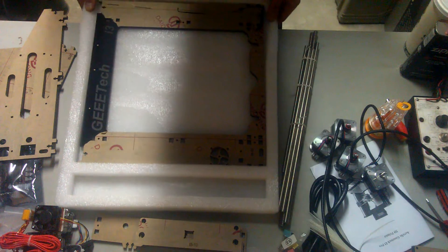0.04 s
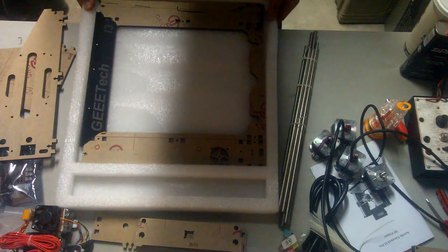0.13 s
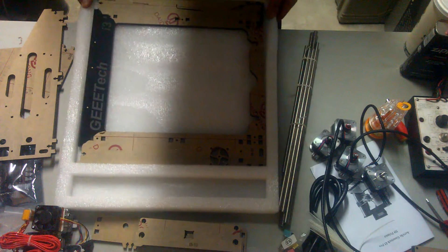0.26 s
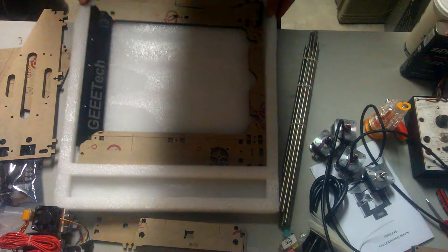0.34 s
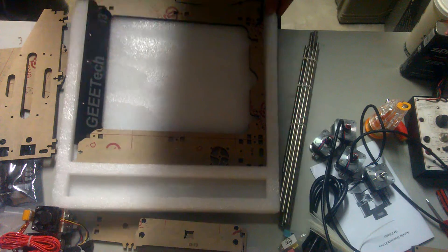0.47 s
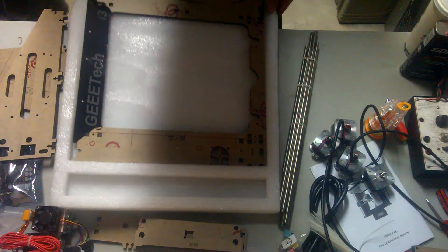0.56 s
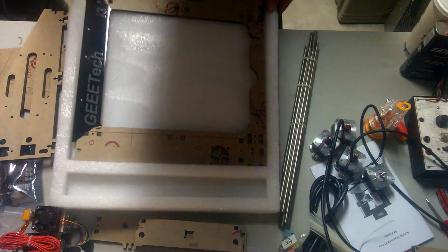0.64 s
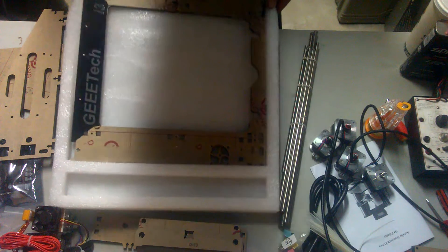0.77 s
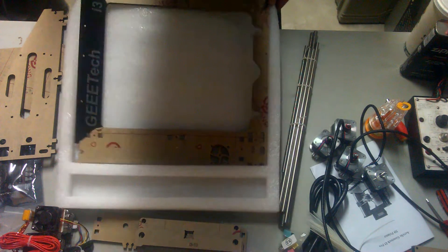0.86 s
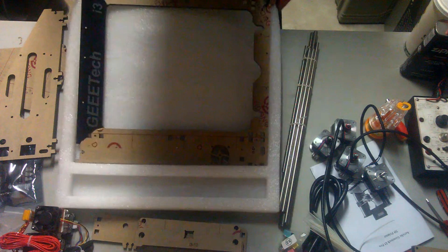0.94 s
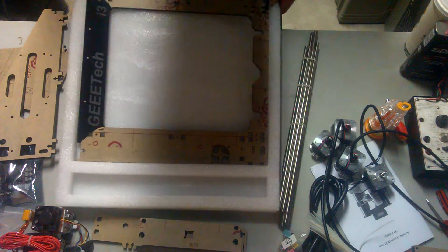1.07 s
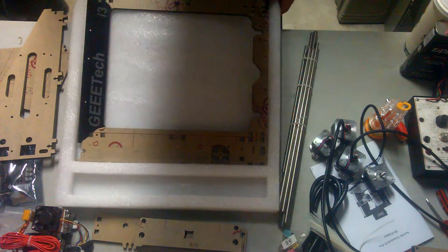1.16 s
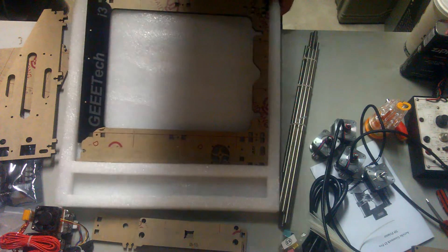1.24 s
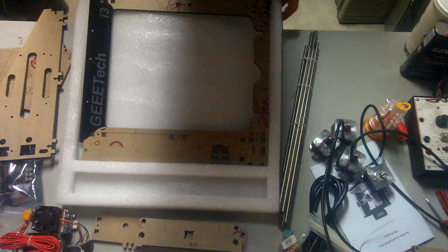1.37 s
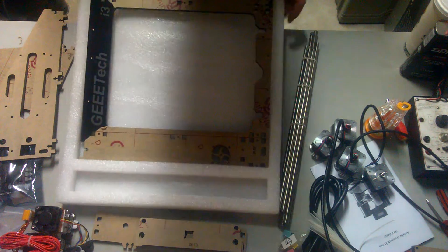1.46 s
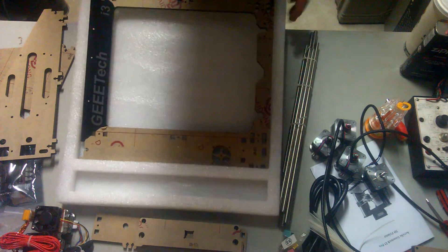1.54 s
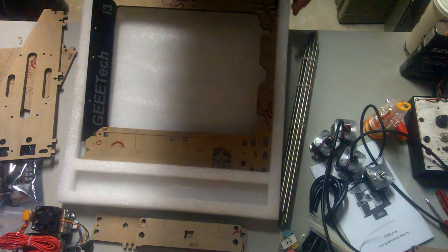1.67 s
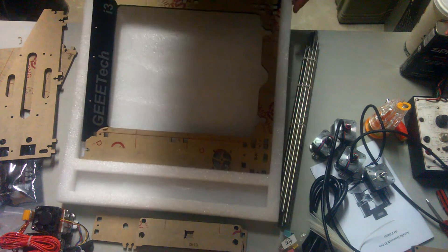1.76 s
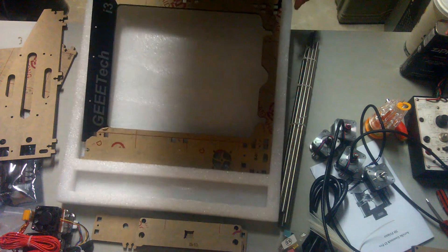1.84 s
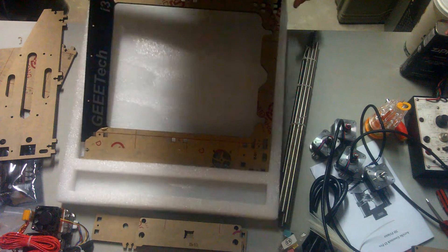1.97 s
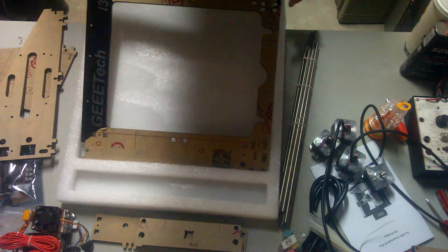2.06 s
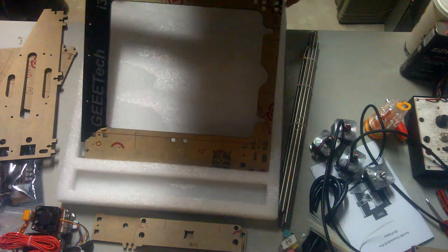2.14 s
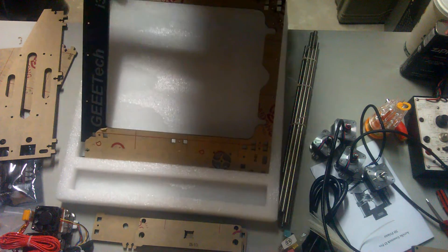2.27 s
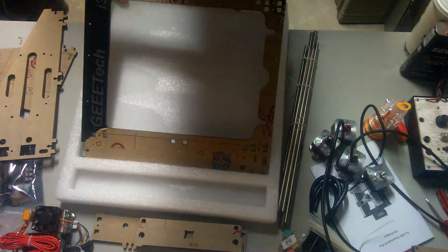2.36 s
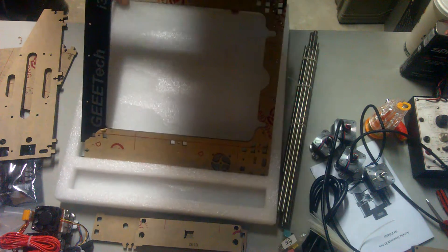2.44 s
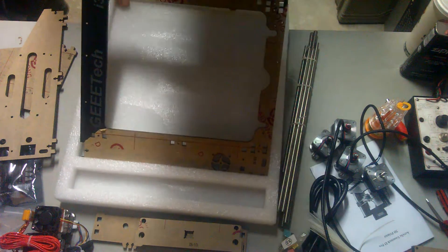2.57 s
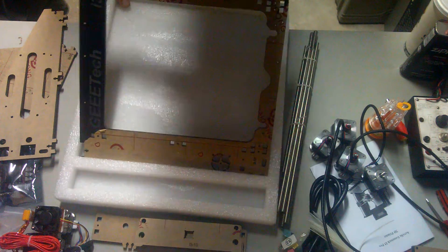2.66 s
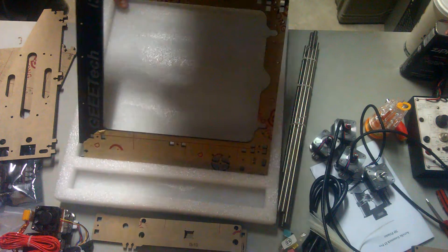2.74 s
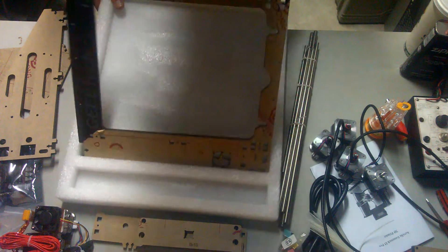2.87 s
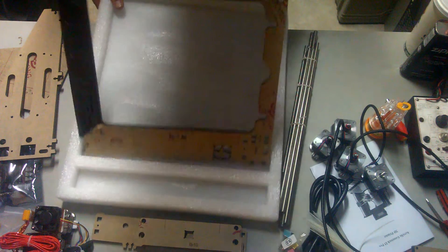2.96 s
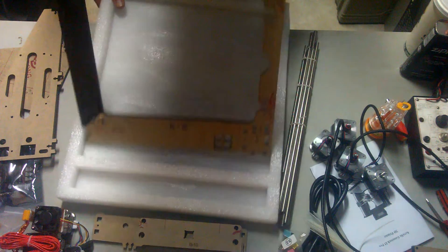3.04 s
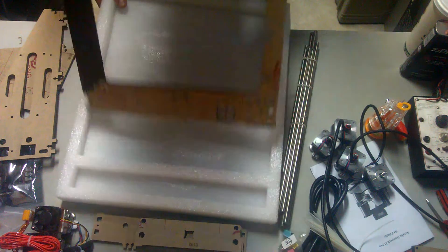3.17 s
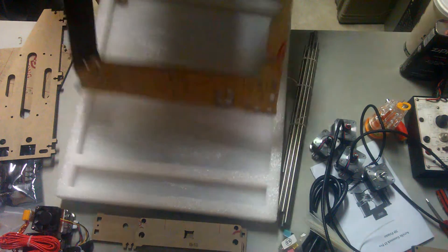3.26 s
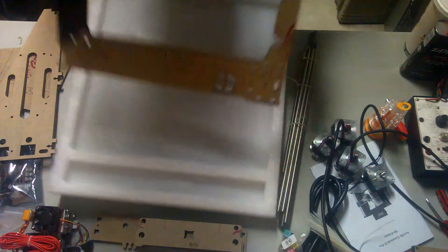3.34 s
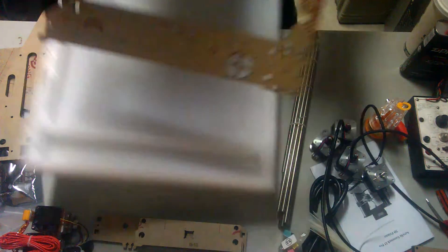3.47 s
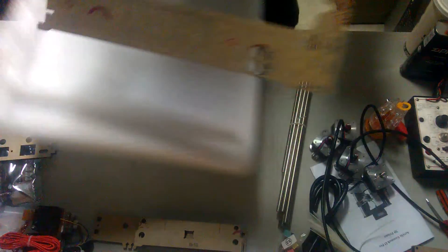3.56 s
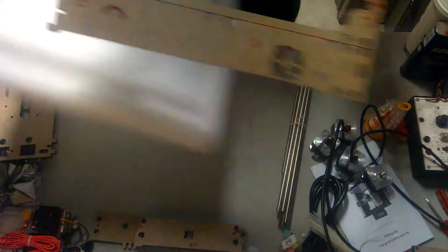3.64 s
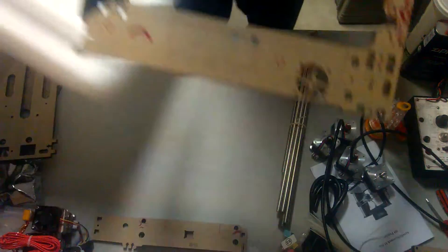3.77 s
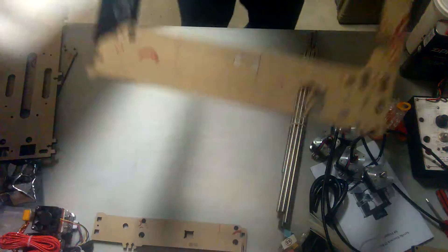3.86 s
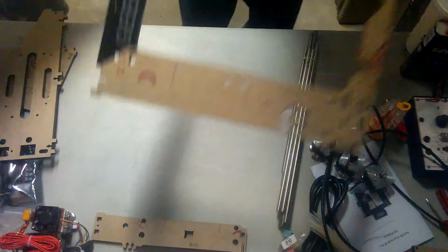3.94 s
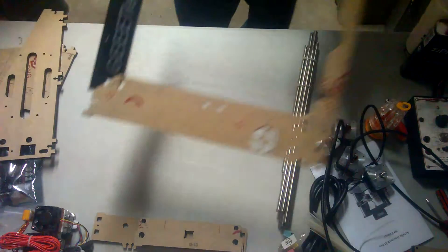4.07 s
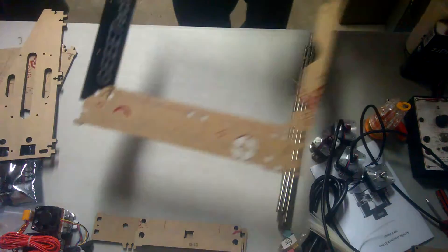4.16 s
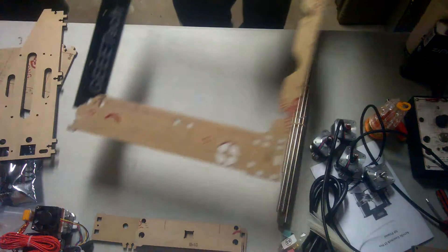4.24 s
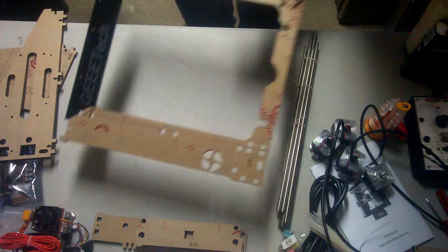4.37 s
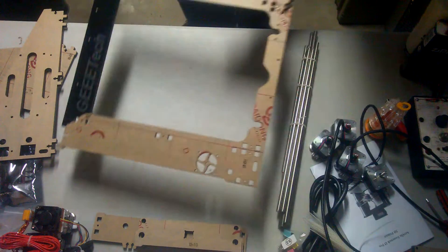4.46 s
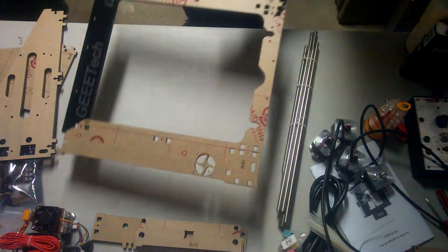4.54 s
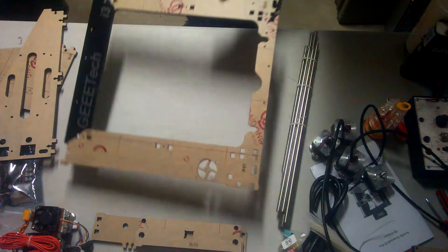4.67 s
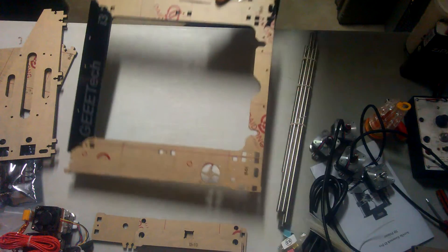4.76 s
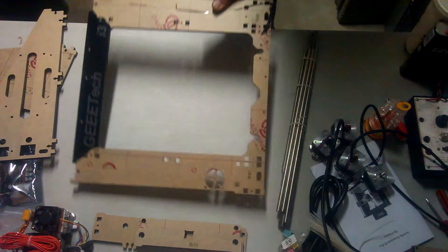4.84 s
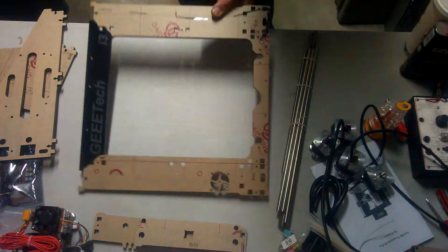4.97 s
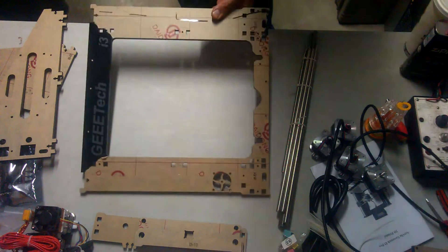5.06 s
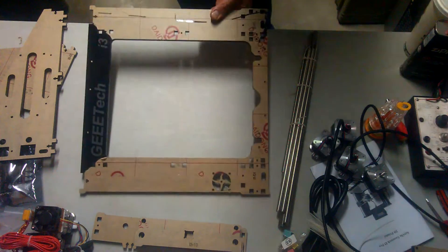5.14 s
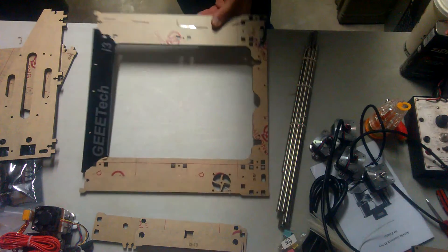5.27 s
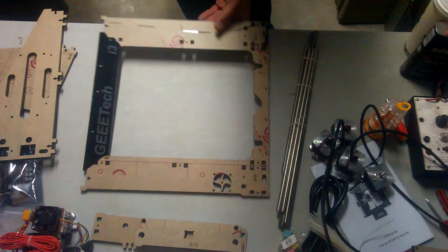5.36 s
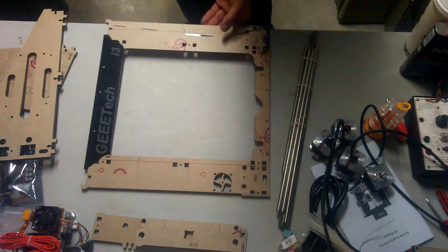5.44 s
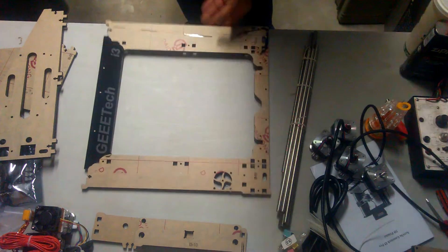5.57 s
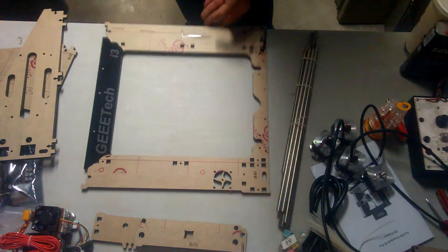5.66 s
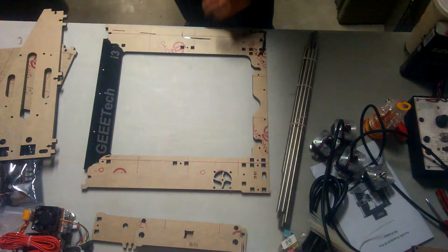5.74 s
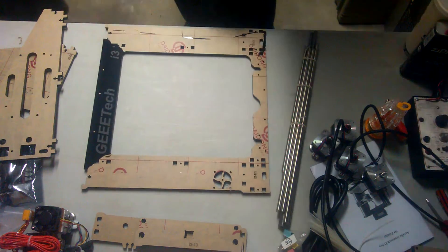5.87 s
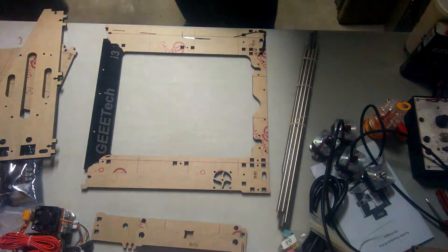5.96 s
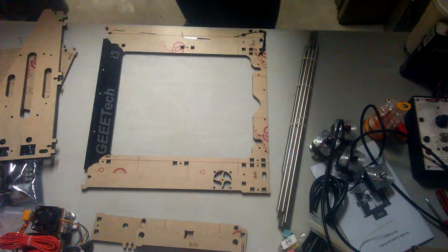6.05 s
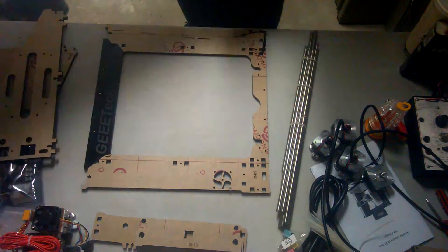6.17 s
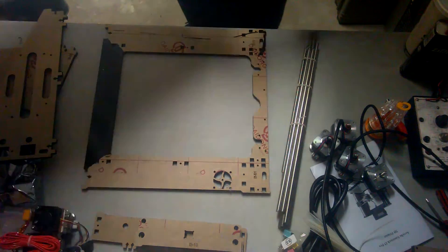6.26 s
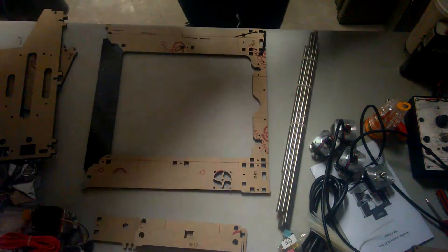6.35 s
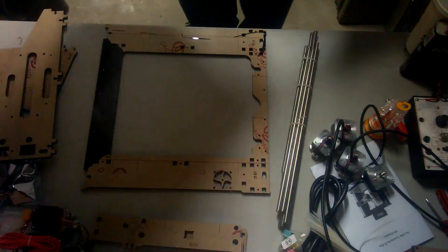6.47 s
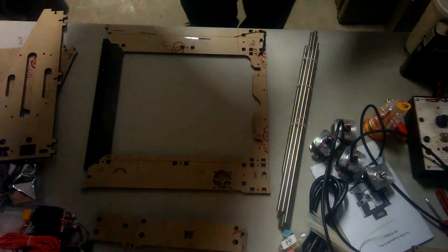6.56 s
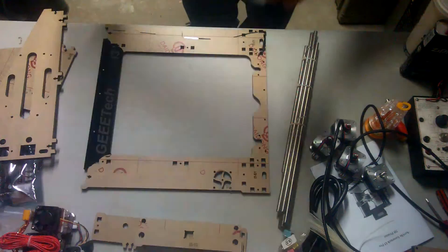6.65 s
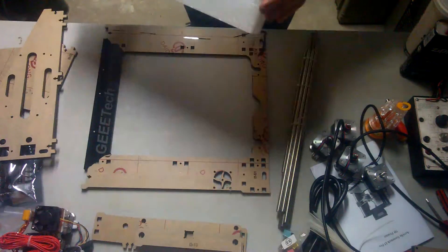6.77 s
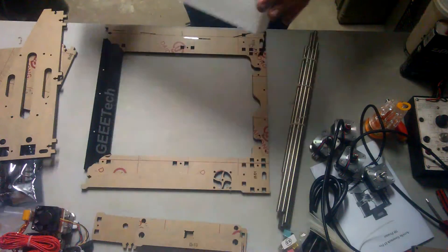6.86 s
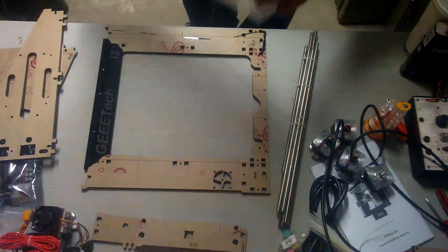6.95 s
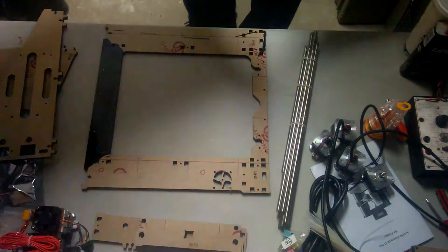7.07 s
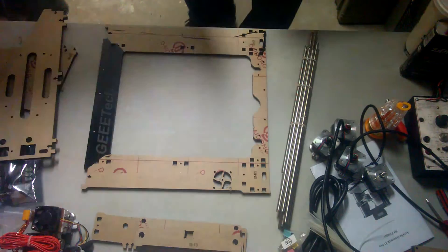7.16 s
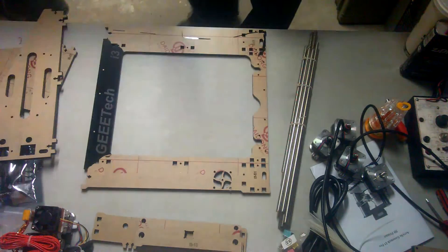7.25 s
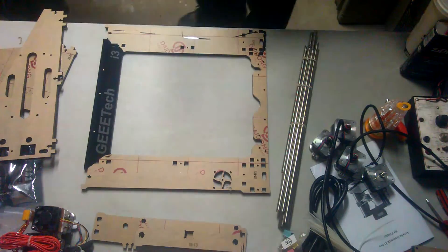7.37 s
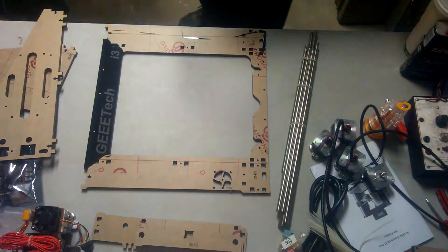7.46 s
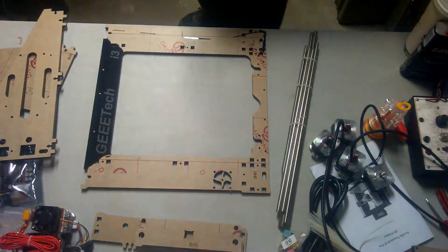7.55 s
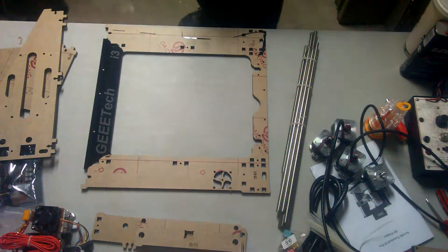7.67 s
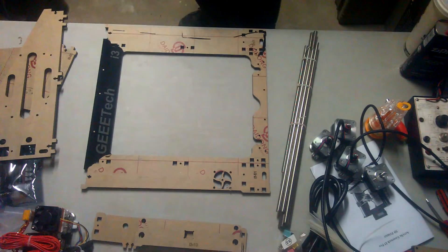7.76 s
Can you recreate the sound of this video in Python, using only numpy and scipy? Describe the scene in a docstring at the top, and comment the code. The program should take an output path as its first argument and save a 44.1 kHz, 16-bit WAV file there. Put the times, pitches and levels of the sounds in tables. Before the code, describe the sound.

Packing foam rubs and squeaks dryly against a wooden frame, then the frame clacks loudly onto a table and the foam is brushed and set aside.

```python
"""Foam packing rubs on a wooden frame: each pull is stick-slip friction, noise shaped by countless tiny slips.
Skin hiss and lower slab rustle are coloured bands of that noise; squeaks are its judder modulating a tone.
As the frame comes out and is laid down, blows ring decaying modes of wood, edges slide, and foam lands and thuds.
A small reverberant room adds air noise, a wavering hum and a fan tone; two cross-fed ports widen the stereo.
"""
import sys
import numpy as np
from scipy import signal
from scipy.fft import rfft, irfft
from scipy.io import wavfile
from scipy.ndimage import uniform_filter1d

SR = 44100
rng = np.random.default_rng(int(sys.argv[2]) if len(sys.argv) > 2 else 0)


def to_wav(s):
    """Save 16-bit WAV."""
    ch = np.atleast_2d(s).T  # columns
    pcm = np.round(np.clip(ch, -1, 1) * 32767)  # PCM
    wavfile.write(sys.argv[1], SR, pcm.astype(np.int16))


N = 344421
TIME = np.arange(N) / SR

# modes of the frame lying on the table, before extra damping: (frequency [Hz], level [dB], t60 [s])
FRAME_MODES = [(134, -3.5, 0.23), (211.7, 0.5, 0.45), (272, 1.5, 0.33), (338, -2.5, 0.12), (370, 1, 0.27),
               (480, -5, 0.18), (563, -5.5, 0.39), (633, -1.5, 0.19), (724, -9.5, 0.22), (792, -8, 0.31),
               (835, -7.5, 0.19), (867, -1.5, 0.18), (918, -3, 0.28), (1070, -2, 0.13), (1218, -5, 0.19),
               (1413, -11, 0.19), (1470, -19, 0.14), (1623, -3.5, 0.11), (1776, -6, 0.2), (1900, -19, 0.16),
               (1990, -18, 0.2)]
# spectrum of the foam's rubbing skin: (frequency [Hz], level [dB])
SKIN_SPECTRUM = [(300, -15.5), (1200, -24.5), (2200, -15), (3200, -11.5), (5000, -17), (8000, -10),
                 (11000, -6), (14200, 1), (16000, -3)]
# spectrum of the foam slab's rustle: (frequency [Hz], level [dB])
SLAB_SPECTRUM = [(60, -41), (200, 1), (450, 2.5), (750, 0.5), (1200, -2), (1700, -5), (2400, -11),
                 (5000, -9.5)]
# spectrum of the frame's scraping edge: (frequency [Hz], level [dB])
EDGE_SPECTRUM = [(100, -21), (250, 12), (550, 19.5), (950, 11), (1650, -2), (2300, 7), (3900, -21),
                 (7000, -16), (15000, -25)]


def undb(db):
    """Level to amplitude: 20 dB is a factor of ten."""
    return 10 ** (np.asarray(db) / 20)


def unit(x):
    """Normalise the mean power: scale to rms 1."""
    return x / np.sqrt(np.mean(x ** 2))


def response(points, size):
    """Transfer function: gain per frequency bin, interpolated in dB over log frequency."""
    hz, db = np.transpose(points)
    bins_hz = np.fft.rfftfreq(size, 1 / SR)
    return undb(np.interp(np.log(bins_hz + 1), np.log(hz), db))


def colour(x, points):
    """Linear filtering: multiply the spectrum by a gain curve, then scale to rms 1."""
    size = x.shape[-1]
    return unit(irfft(rfft(x) * response(points, size), size))


def band_level(x, band):
    """Band-power normalisation: scale so that one band has rms 1."""
    band_filter = signal.butter(4, band, "band", fs=SR, output="sos")
    return x / np.std(signal.sosfilt(band_filter, x))


def onset_level(x):
    """Onset normalisation: scale so that the first 20 ms have rms 1."""
    return x / np.std(x[:, :SR // 50])


def fade(t60, size):
    """Exponential damping: amplitude falls by 60 dB in t60 seconds."""
    return np.exp(-np.log(1000) * TIME[:size] / t60)


def walk(rate):
    """Slow random modulation: a smoothed wander of rms 1, with a new target rate times a second."""
    hold = int(SR / rate)
    targets = rng.standard_normal(N // hold + 1)
    return unit(uniform_filter1d(np.repeat(targets, hold), hold)[:N])


def diffuse(size, likeness=0.67, apart_hz=900):
    """Diffuse-field coherence: long waves reach both ports partly alike, short ones are unrelated."""
    alike = likeness / (1 + (np.fft.rfftfreq(size, 1 / SR) / apart_hz) ** 2)
    mid, side = rfft(rng.standard_normal((2, size)))
    mid = mid * np.sqrt(1 + alike)
    side = side * np.sqrt(1 - alike)
    return unit(irfft(np.array([mid + side, mid - side]), size))


def room(x, wet_db, t60_s=0.24):
    """Reverberation: convolve with exponentially decaying diffuse noise and add it to the direct sound."""
    size = SR // 2
    after_gap = TIME[:size] > 0.006  # first 6 ms stay free of reverberation
    tail = diffuse(size) * fade(t60_s, size) * after_gap
    tail /= np.sqrt(np.sum(tail ** 2) / 2)  # unit energy per port
    return x + undb(wet_db) * signal.fftconvolve(x, tail, axes=1)[:, :N]


def ring(modes, size, damping, spread=0.14, centred=False):
    """Modal synthesis: a sum of damped sinusoids, a little out of phase at the two ports."""
    if centred:  # modes start near zero, alternately rising and falling
        phases = np.pi * np.arange(len(modes))[:, None]
    else:
        phases = rng.uniform(0, 2 * np.pi, (len(modes), 1))
    phases = phases + spread * rng.standard_normal((len(modes), 2))
    total = 0
    for (hz, db, t60), phase in zip(modes, phases):
        swing = np.sin(2 * np.pi * hz * TIME[:size] + phase[:, None])
        total = total + undb(db) * fade(t60 / damping, size) * swing
    return total


def add(track, s, sound):
    """Superposition: mix a sound into the track from a given second."""
    start = int(s * SR)
    track[:, start:start + sound.shape[1]] += sound[:, :N - start]


def stroke(start, length, attack_s=0.013, release_s=0.01, easing=0.012):
    """Envelope of one push: exponential approach, hold and decay; longer strokes ease more slowly."""
    age = np.maximum(TIME - start, 0)
    ease = easing * length
    attack = (1 - np.exp(-age / (attack_s + ease))) ** 2
    release = np.exp(-np.maximum(age - length, 0) / (release_s + ease))
    return attack * release


def friction(rate, scatter_db, judder_db, judder_rate, grain_t60):
    """Stick-slip friction: random slips of uneven size, each releasing a decaying burst of noise power."""
    occurs = rng.random(N) < rate / SR  # rate in slips per second
    slips = occurs * undb(scatter_db * np.minimum(rng.exponential(size=N), 5))
    slips = slips * undb(judder_db * walk(judder_rate))
    decay = fade(grain_t60, 2)[1] ** 2  # power kept from one sample to the next
    power = signal.lfilter([1], [1, -decay], slips ** 2 + 1e-18)
    return diffuse(N) * np.sqrt(power)


def crackle(rate=110, scatter_db=1.0, t60=0.011):
    """Buckling instability: now and then a whole cell wall gives way with a tiny tick; rms 1."""
    return unit(friction(rate=rate, scatter_db=scatter_db, judder_db=2.0, judder_rate=28, grain_t60=t60))


def patchy(x, depth_db, size):
    """Time-varying filtering: narrow bands swell and sink as the contact moves from patch to patch."""
    bands = signal.stft(x, nperseg=size)[2]
    swell = rng.standard_normal(bands.shape[1:])
    swell = uniform_filter1d(swell, size=3, axis=0)  # across frequency
    swell = uniform_filter1d(swell, size=4, axis=1)  # through time
    return signal.istft(bands * undb(depth_db * unit(swell)))[1][:, :N]


def background():
    """Broadband flow noise and tonal hum: ventilation rumble, faint hiss, wavering hum and thin fan tone."""
    # spectrum of the ventilation's air noise: (frequency [Hz], level [dB])
    air_spectrum = [(20, -2), (45, 1.5), (75, 1), (115, -3.5), (200, -6.5), (400, -6), (700, -10.5),
                    (1100, -22), (2000, -31), (4000, -34), (8000, -29.5), (14500, -23.5)]
    # level of the whole background over time, dipping just after the loud slap: (time [s], level [dB])
    swell_points = [(0, 4.5), (1.1, 1), (2.5, -0.5), (4.1, 1.5), (4.7, -2), (5.5, 4.5), (5.85, -4.5),
                    (6.1, -5.5), (6.6, -1.5), (7.2, 0.5), (7.8, 0)]
    air = band_level(colour(diffuse(N), air_spectrum), (100, 700))
    hum_hz = 78.6 + 3.45 * walk(20)
    hum = np.sin(2 * np.pi * np.cumsum(hum_hz) / SR) * undb(3.3 * walk(12))
    fan_hz = 347 + 3 * walk(15)
    fan = np.sin(2 * np.pi * np.cumsum(fan_hz) / SR) * undb(1.3 * walk(4.8))
    swell = undb(np.interp(TIME, *np.transpose(swell_points)))
    air_gain = undb(-50.5 + 1.3 * walk(4.5))
    return (air_gain * air + undb(-54.5) * unit(hum) + undb(-63) * unit(fan)) * swell


def slides(frame_db=-3, ring_hz=3900, ring_width_hz=700, ring_db=-17):
    """Friction-driven resonance: the edge's slips excite the frame's modes, a faint ring and a hiss."""
    # the frame's edge sliding on the table:
    # (start [s], length [s], chatter [dB], hiss [dB], lowest frequency [Hz], highest frequency [Hz])
    slide_events = [(4.315, 0.045, -46, -47.5, 600, 1410), (5.131, 0.14, -51, -54, 120, 920),
                    (5.415, 0.068, -41, -44.5, 860, 1750), (5.5, 0.088, -48, -42.5, 150, 1700)]
    slips = friction(rate=2100, scatter_db=-3.0, judder_db=-3.5, judder_rate=76, grain_t60=0.017)
    frame = signal.fftconvolve(slips, ring(FRAME_MODES, SR // 4, damping=2.0), axes=1)[:, :N]
    chatter = colour(slips, EDGE_SPECTRUM) + undb(frame_db) * unit(frame)
    whine = unit(signal.lfilter(*signal.iirpeak(ring_hz, ring_hz / ring_width_hz, fs=SR), slips))
    hiss = colour(diffuse(N), SKIN_SPECTRUM)
    out = 0
    for start, length, chatter_db, hiss_db, low_hz, high_hz in slide_events:
        contact = signal.butter(2, [low_hz, high_hz], "band", fs=SR, output="sos")
        wood = unit(signal.sosfilt(contact, chatter)) + undb(ring_db) * whine
        out = out + (undb(chatter_db) * wood + undb(hiss_db) * hiss) * stroke(start, length)
    return room(out, wet_db=-1.0)


def edge_knocks(scuff_db=-11, scuff_t60=0.25):
    """Contact low-pass: a soft bump of the held frame's edge excites only its lowest modes, plus a scuff."""
    # bottom edge bumping the table: (time [s], level before a common trim [dB], contact bandwidth [Hz])
    edge_events = [(4.9263, -24, 1000), (4.932, -26.5, 620), (4.9405, -21, 280), (4.994, -31, 500),
                   (5.05, -30, 377), (5.084, -37, 500), (5.221, -37.5, 550), (5.427, -32, 260),
                   (5.473, -30, 240)]
    # frame tilted on its edge in the hand, before a damping factor: (frequency [Hz], level [dB], t60 [s])
    held_modes = [(84, -22, .12), (232, 6.5, 0.098), (350, -4, .08), (435, -5.5, 0.24), (512.4, 1, 0.15),
                  (624, -3, 0.11), (824, -15, 0.12), (1020, -21, 0.12)]
    out, size = np.zeros((2, N)), SR // 2
    for s, db, contact_hz in edge_events:
        contact = signal.butter(2, contact_hz, fs=SR, output="sos")
        notes = ring(held_modes, size, damping=0.76, centred=True)
        notes = onset_level(signal.sosfilt(contact, notes))
        scuff = colour(diffuse(size), EDGE_SPECTRUM) * fade(scuff_t60, size)
        scuff = onset_level(signal.sosfilt(contact, scuff))
        add(out, s, undb(db - 4.5) * (notes + undb(scuff_db) * scuff))
    return room(out, wet_db=-13)


def knocks(choke_s=0.022):
    """Impact excitation: blows ring frame and table; the contact band makes them dull or thin, slaps crack."""
    # wood knocking on the table: (time [s], level before a common trim [dB], lowest frequency [Hz],
    # highest contact frequency [Hz], crack relative to wood [dB])
    knock_events = [(4.305, -46, 450, 2100, -12), (4.338, -41, 700, 1400, -10), (4.349, -41, 550, 1300, -8),
                    (5.052, -40.5, 500, 1210, -16), (5.3516, -33.5, 705, 1880, -8.5),
                    (5.45, -42, 900, 1900, -7), (5.467, -39, 1200, 1880, -4), (5.476, -41.5, 800, 1780, 1),
                    (5.592, -15, 106, 1250, -19.5), (5.6061, -14, 260, 1900, -3),
                    (5.6104, -9.5, 110, 1500, -9), (5.626, -18.5, 130, 1610, -19),
                    (5.645, -20, 80, 600, -29), (5.673, -24, 130, 900, -25), (7.063, -28, 256, 1400, -30)]
    # spectrum of the struck table top: (frequency [Hz], level [dB])
    table_spectrum = [(50, 10.5), (130, 0), (240, -2), (370, 14), (480, -9), (900, -4), (1600, -3.5),
                      (2400, -14), (6000, -28)]
    # spectrum of the hard crack: (frequency [Hz], level [dB])
    crack_spectrum = [(500, 0), (2000, 1.5), (3200, 0.5), (4300, -6), (5500, -1), (7000, -5), (10000, -3.5),
                      (14000, -5.5), (16000, -16.5)]
    out, size = np.zeros((2, N)), SR // 2
    next_times = [row[0] for row in knock_events[1:]] + [np.inf]
    clack_and_rattle = fade(0.02, size) + undb(-2) * fade(0.11, size)
    for (s, db, low_hz, high_hz, crack_db), next_s in zip(knock_events, next_times):
        table = onset_level(colour(diffuse(size), table_spectrum) * clack_and_rattle)
        # the next contact damps the frame modes still ringing from this one
        choke = np.exp(-np.maximum(s + TIME[:size] - next_s, 0) / choke_s)
        frame = onset_level(ring(FRAME_MODES, size, damping=1.42)) * choke
        wood = undb(-1.5) * table + frame
        contact = signal.butter(3, [low_hz, high_hz], "band", fs=SR, output="sos")
        crack_decay = fade(0.034, size) + undb(-17) * fade(0.42, size)
        crack = onset_level(colour(diffuse(size), crack_spectrum) * crack_decay)
        blow = onset_level(signal.sosfilt(contact, wood)) + undb(crack_db) * crack
        add(out, s, undb(db - 5.5) * blow)
    return room(out, wet_db=-5.0)


def thuds():
    """Damped bending vibration: as the slab lands, its upper modes die quickly and the low ones sway on."""
    # the slab set down: (time [s], level [dB])
    thud_events = [(6.697, -30.5), (6.771, -44)]
    # the whole slab bending, before a damping factor: (frequency [Hz], level [dB], t60 [s])
    bending_modes = [(30, -10, 0.36), (81, -12.5, 0.28), (139, -8, .16), (218, 2.5, 0.06), (289, 0, .06)]
    out = np.zeros((2, N))
    for s, db in thud_events:
        add(out, s, undb(db) * onset_level(ring(bending_modes, SR // 2, damping=0.66, centred=True)))
    return room(out, wet_db=-8.5)


def bumps(attack_s=0.0015):
    """Soft impact: a hand sets the slab's low modes going and scuffs its surface."""
    # hand bumping the foam slab: (time [s], thump [dB], rustle [dB])
    bump_events = [(3.235, -61, -41.5), (6.116, -34, -33), (6.312, -45, -46), (6.697, -49, -38),
                   (6.778, -52, -41), (6.843, -46, -34.5), (7.076, -62, -53), (7.29, -53, -44)]
    # modes of the foam slab, before extra damping: (frequency [Hz], level [dB], t60 [s])
    slab_modes = [(91, -12, 0.19), (133, -1.5, 0.16), (182, -6, 0.1), (229, 9, 0.13), (274, -8, 0.2),
                  (345, -27, .1)]
    out, size = np.zeros((2, N)), SR // 3
    attack = 1 - np.exp(-TIME[:size] / attack_s)
    for s, thump_db, rustle_db in bump_events:
        rustle = onset_level(colour(diffuse(size), SLAB_SPECTRUM) * fade(0.079, size))
        thump = onset_level(ring(slab_modes, size, damping=1.17))
        add(out, s, (undb(thump_db) * thump + undb(rustle_db) * rustle) * attack)
    return room(out, wet_db=-4.5)


def squeaks(width_hz=380, wander=0.05, wander_per_s=18):
    """Amplitude modulation: catching foam judders, spreading a wandering tone into a rough band."""
    # foam squeaking as it catches: (start [s], length [s], level [dB], pitch [Hz])
    squeak_events = [(0.226, 0.3, -54.5, 2093), (0.597, 0.13, -47.5, 2054), (1.136, 0.047, -52.5, 1550),
                     (1.201, 0.026, -51.5, 1390), (1.473, 0.2, -59, 1296), (1.711, 0.026, -45, 1217),
                     (1.784, 0.54, -66, 1563), (3.116, 0.02, -45, 1730), (7.306, 0.021, -38, 1710)]
    slips = friction(rate=1200, scatter_db=1, judder_db=1.2, judder_rate=60, grain_t60=0.012)
    low_pass = signal.butter(2, width_hz / 2, fs=SR, output="sos")
    judder = unit(signal.sosfilt(low_pass, slips))
    # phase of a 1 Hz wandering tone [rad], multiplied by each squeak's pitch
    turns = 2 * np.pi * np.cumsum(1 + wander * walk(wander_per_s)) / SR
    out = 0
    for start, length, db, hz in squeak_events:
        tone = np.sqrt(2) * np.sin(hz * turns)
        out = out + judder * (undb(db) * tone * stroke(start, length))
    return room(out, wet_db=-6.0)


def snaps(attack_share=0.054):
    """Sudden release of stored strain: a stuck foam patch lets go; a larger patch takes longer to peel."""
    # foam snapping free: (time [s], level before a common boost [dB], nominal length [s])
    snap_events = [(0.4345, -29.5, 0.011), (0.495, -36, 0.01), (2.44, -53, 0.052), (2.853, -40, .02),
                   (3.464, -35.5, 0.046), (3.505, -35, 0.014), (3.713, -47.5, 0.046), (6.112, -34, 0.13)]
    out, size = np.zeros((2, N)), SR // 4
    for s, db, length in snap_events:
        attack = 1 - np.exp(-TIME[:size] / (attack_share * length))
        peel = attack * fade(length * 0.98, size)
        add(out, s, undb(db + 15.0) * colour(diffuse(size), SKIN_SPECTRUM) * peel)
    return room(out, wet_db=-0.5)


def foam(rasp_hz=7350, rasp_db=6, rasp_share=0.58):
    """Stick-slip friction: cell walls catch and slip on wood with a bright hiss, and the slab rustles lower."""
    # pulls and brushes rubbing the foam, the first already under way, levels before common trims:
    # (start [s], length [s], skin hiss [dB], slab rustle [dB])
    pull_events = [(-0.06, 0.65, -43.5, -59), (0.142, 0.35, -47, -50), (0.226, 0.3, -39.5, -56.5),
                   (0.579, 0.25, -35.5, -53), (0.602, 0.11, -47, -42.5), (0.661, 0.061, -25.5, -40.5),
                   (0.837, 0.45, -43, -62.5), (1.301, 0.075, -38.5, -55.5), (1.38, 0.54, -42, -56.5),
                   (1.795, 0.21, -39, -54.5), (1.97, 0.4, -46.5, -57), (2.2, 1.57, -52.5, -70.5),
                   (2.61, 0.15, -50, -62), (2.696, 0.13, -40.5, -49), (2.807, 0.18, -35, -42.5),
                   (2.84, 0.065, -30.5, -60), (3.125, 0.23, -38.5, -52), (3.191, 0.055, -36, -43.5),
                   (3.436, 0.084, -32, -40), (3.577, 0.1, -43.5, -76), (3.803, 0.066, -44, -53),
                   (3.876, 1.1, -64, -84), (5.751, 0.27, -48.5, -66), (6.179, 0.19, -40.5, -51),
                   (6.264, 0.056, -41, -48.5), (6.383, 0.12, -37.5, -47.5), (6.449, 0.035, -32, -41.5),
                   (6.514, 0.27, -34.5, -47.5), (6.567, 0.054, -39, -40.5), (6.788, 0.35, -31, -41),
                   (6.902, 0.12, -57, -44.5), (7.1, 0.37, -42, -62.5), (7.208, 0.048, -32.5, -43.5),
                   (7.265, 0.071, -37, -42), (7.507, 0.11, -35, -49), (7.586, 0.054, -36, -45.5)]
    fine = unit(friction(rate=5000, scatter_db=2.2, judder_db=1.3, judder_rate=70, grain_t60=0.006))
    skin = colour(patchy(fine + undb(-10) * crackle(), depth_db=2, size=256), SKIN_SPECTRUM)
    coarse = unit(friction(rate=1200, scatter_db=1.5, judder_db=1.74, judder_rate=64, grain_t60=0.024))
    slab = colour(patchy(coarse + undb(-3.5) * crackle(), depth_db=3, size=512), SLAB_SPECTRUM)
    # overlapping pulls add in power
    power = np.zeros((2, N))
    for start, length, hiss_db, rustle_db in pull_events:
        power += np.outer(undb([hiss_db, rustle_db]), stroke(start, length)) ** 2
    hiss, rustle = np.sqrt(power)
    # the harder a pull shakes the slab, the more the skin rasps below rasp_hz
    skin = band_level(skin, (6000, 15000))
    rasp = signal.sosfiltfilt(signal.butter(4, rasp_hz, fs=SR, output="sos"), skin)
    rasp_gain = undb(rasp_db) * hiss ** (1 - rasp_share) * rustle ** rasp_share
    skin = (skin - rasp) * hiss + rasp * rasp_gain
    slab = band_level(slab, (900, 2000)) * rustle
    # the hand's wavering pressure lifts the slab while it slightly softens the skin
    pressure = walk(32)
    skin_gain = undb(-1.5 - 0.68 * pressure)
    slab_gain = undb(-7.0 + 3 * pressure)
    return room(skin_gain * skin + slab_gain * slab, wet_db=-2.5)


def scene():
    """Superposition: foam, wood and room sound add linearly."""
    foam_sounds = foam() + snaps() + squeaks() + bumps() + thuds()
    wood_sounds = edge_knocks() + knocks() + slides()
    return foam_sounds + wood_sounds + background()


def record(dry, port_lag_s=0.000389, top_hz=15550):
    """Delay-and-subtract directivity: each port minus the other one delayed; then the top is cut."""
    # share of each port taken from the other, limited to 0 dB: (frequency [Hz], level [dB])
    cross_feed = [(100, -27), (500, -6.5), (1200, -3), (2600, 7.8), (5200, 0), (8000, -13), (13000, -1.5)]
    # response of the left port: (frequency [Hz], level [dB])
    left_port = [(100, 4), (300, 1), (6000, 2.5), (9000, -1), (12000, -3), (16000, -11)]
    ports = rfft(dry) * np.array([response(left_port, N), np.ones(N // 2 + 1)])
    lag = np.exp(-2j * np.pi * np.fft.rfftfreq(N, 1 / SR) * port_lag_s)
    share = np.minimum(response(cross_feed, N), 1)
    wide = irfft(ports - share * lag * ports[::-1], N)
    top_cut = signal.ellip(10, 0.2, 70, top_hz, fs=SR, output="sos")
    return signal.sosfilt(top_cut, np.clip(wide, -1, 1))


dry = scene()
out = record(dry)
to_wav(out)
```